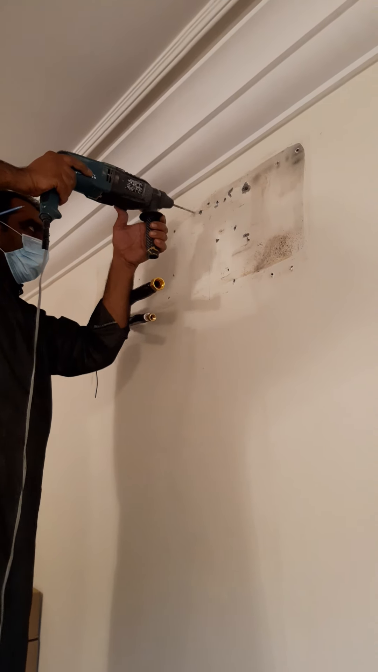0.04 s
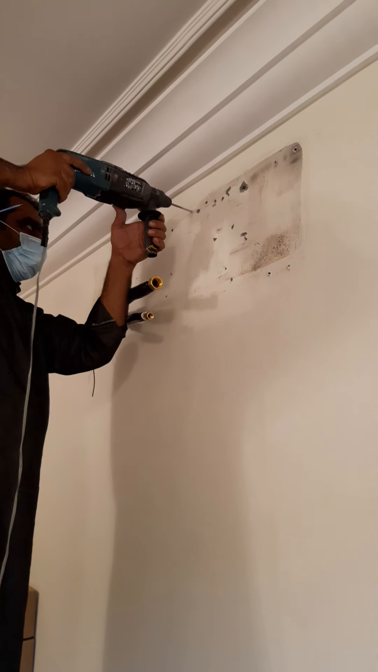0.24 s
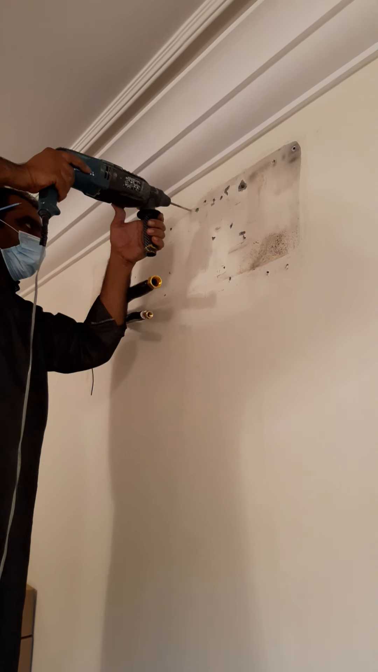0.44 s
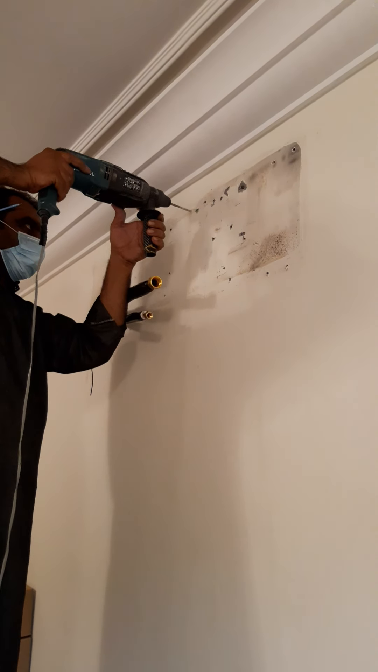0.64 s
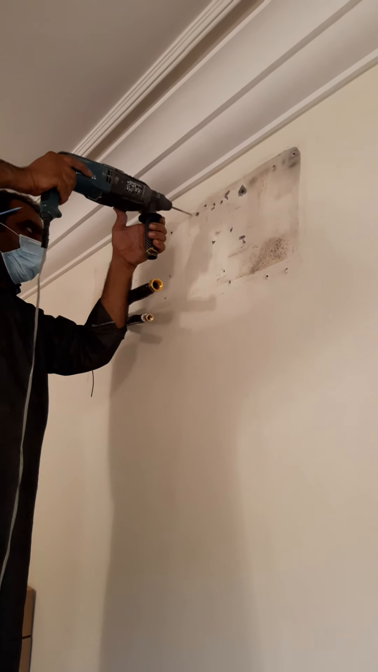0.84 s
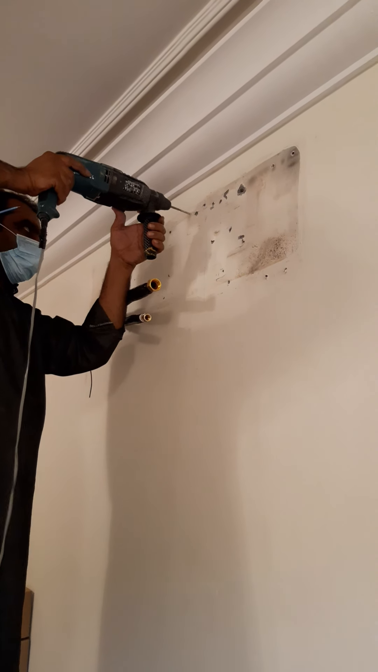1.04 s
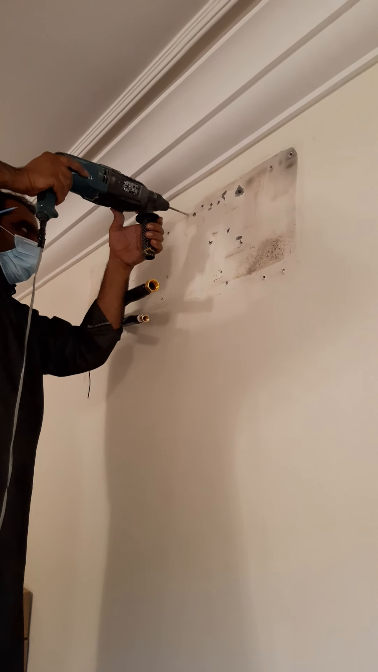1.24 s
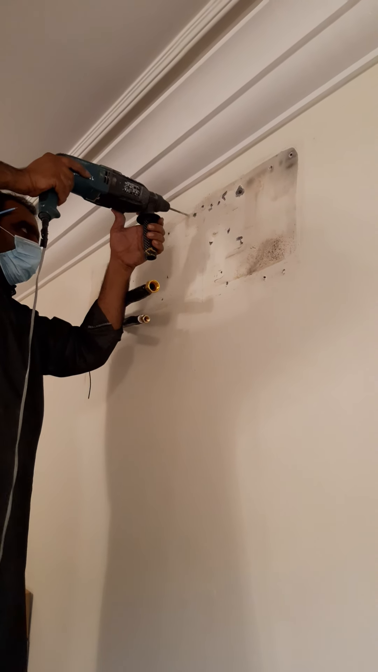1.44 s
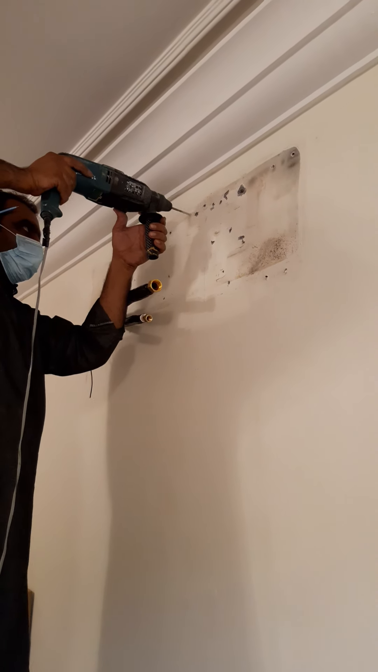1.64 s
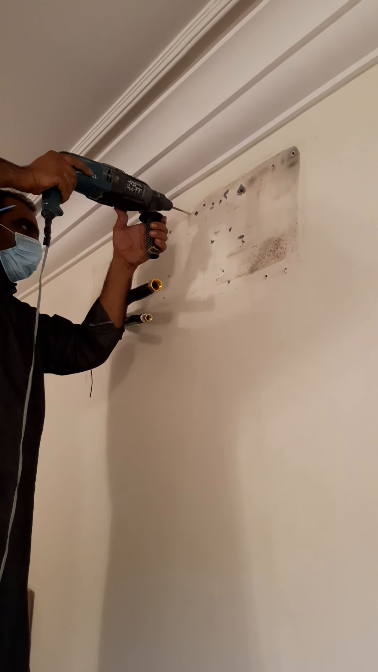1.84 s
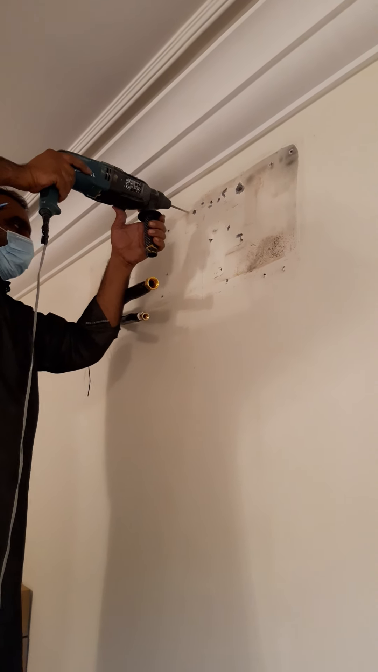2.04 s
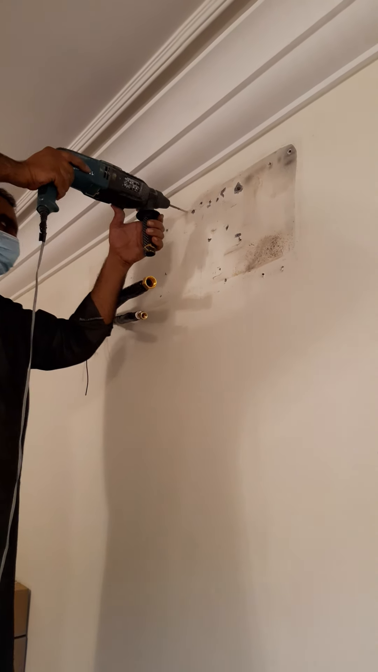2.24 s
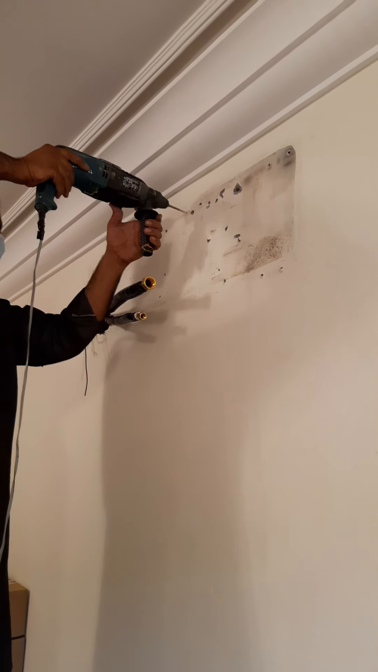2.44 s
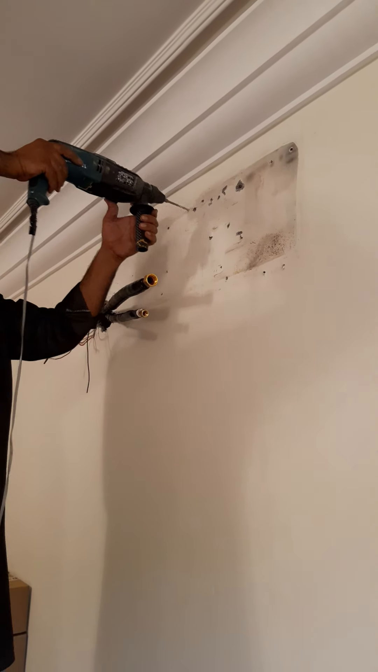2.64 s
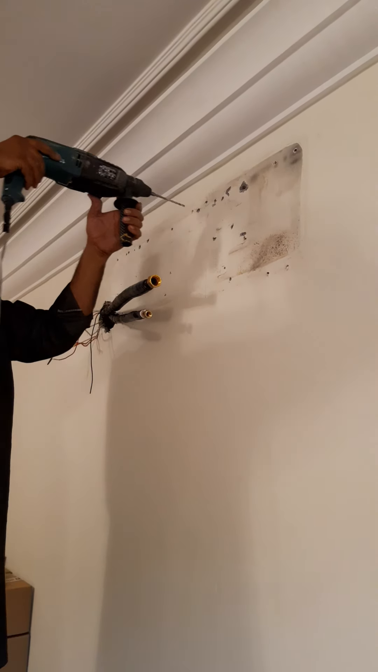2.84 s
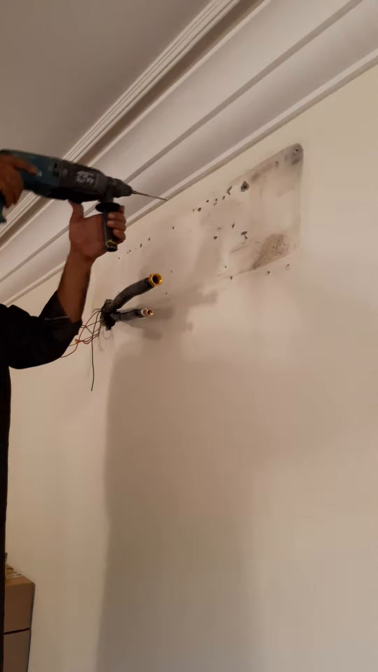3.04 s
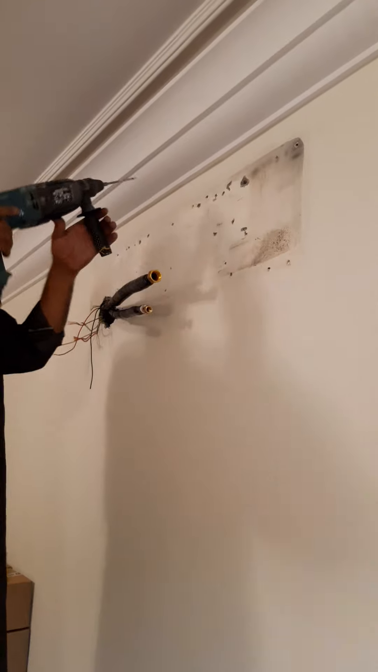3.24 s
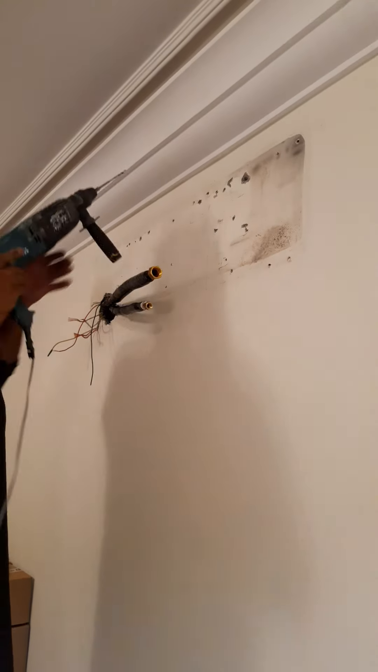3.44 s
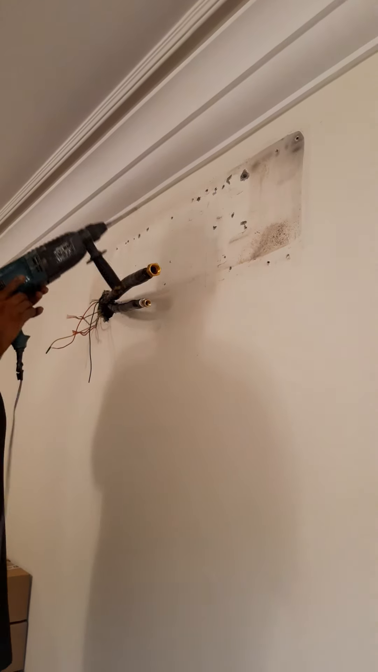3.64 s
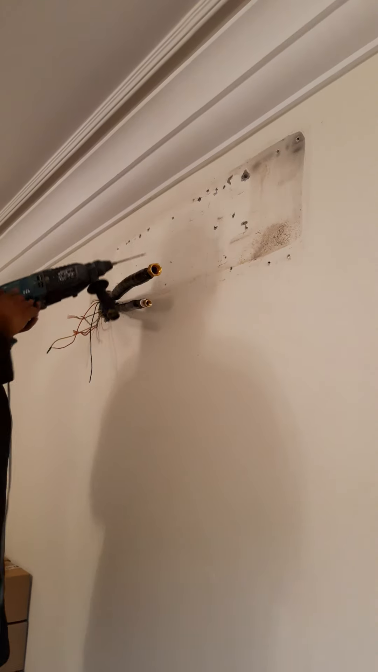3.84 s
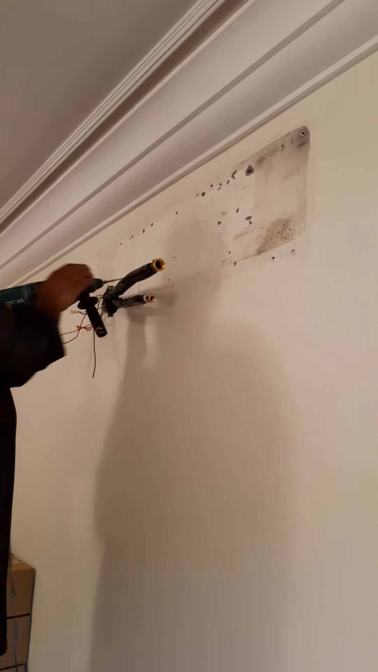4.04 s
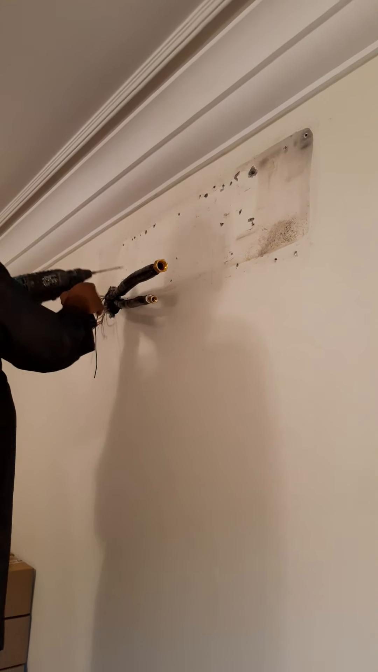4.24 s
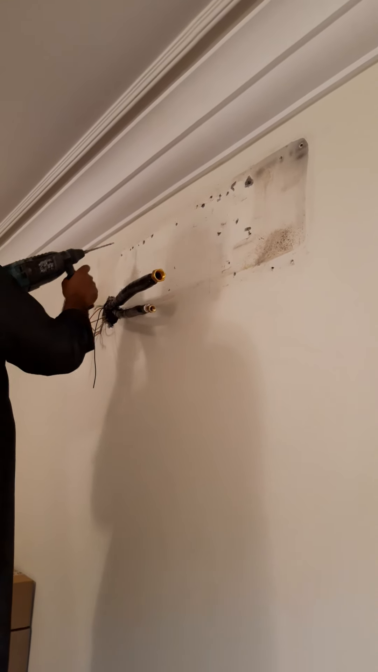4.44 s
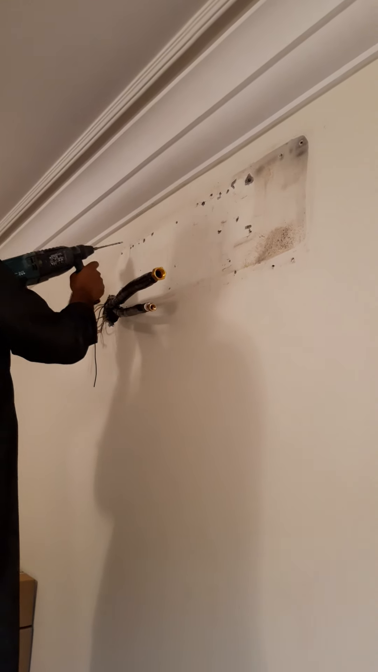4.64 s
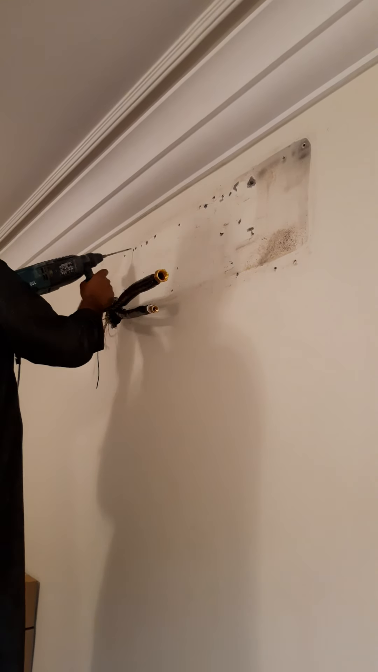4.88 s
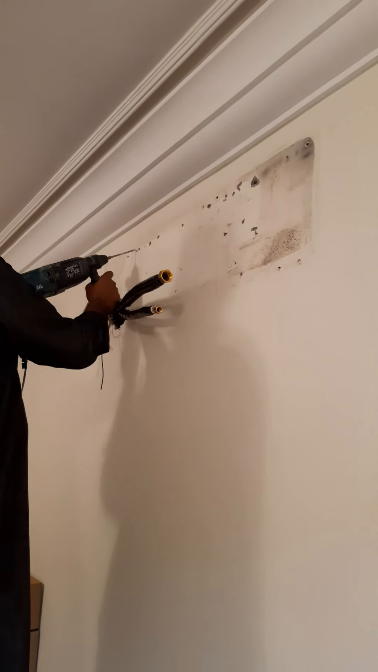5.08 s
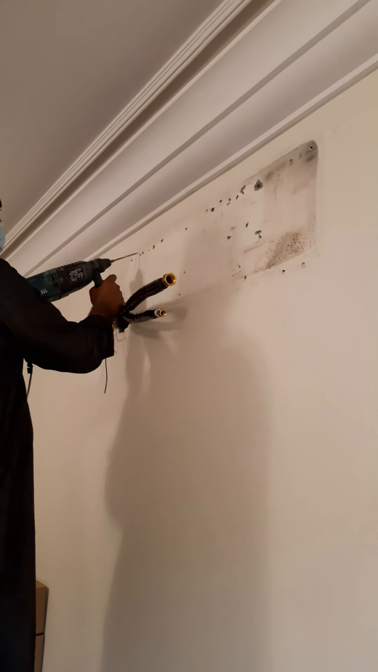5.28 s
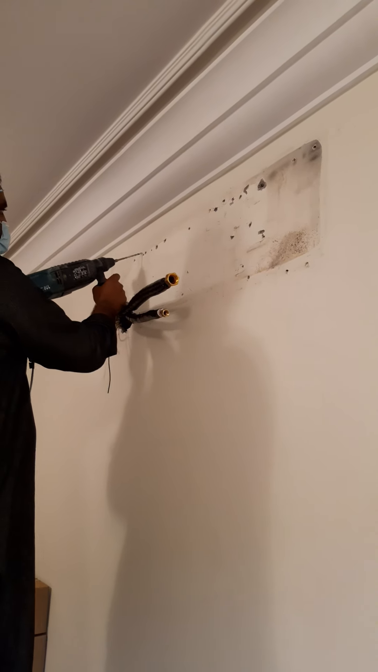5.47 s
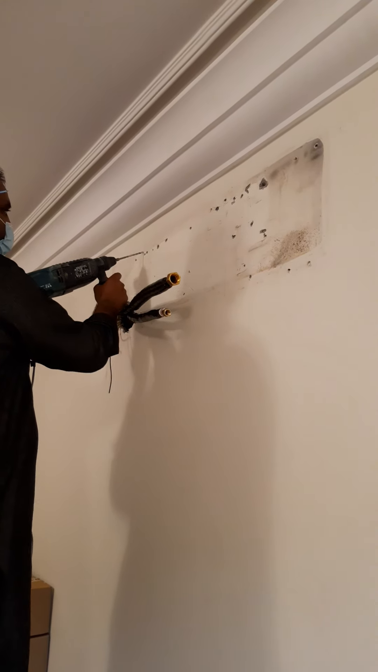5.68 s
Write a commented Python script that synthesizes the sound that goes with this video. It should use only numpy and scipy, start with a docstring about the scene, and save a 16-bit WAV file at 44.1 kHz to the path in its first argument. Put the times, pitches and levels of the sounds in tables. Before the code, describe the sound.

Loud hammer drilling into plaster stops and the motor spins down, then the tool knocks and scrapes lightly in an echoing room.

```python
"""First comes the loud, fast rattle of a corded hammer drill boring into a plastered wall in a bare room.
A striker hits the bit about 62 times a second; the bit grinds in the hole and the wall hums along.
The trigger is let go and the motor whines down. Then the drill, pulled out of the hole,
knocks and scrapes as it is shifted in the hands."""
import sys
import numpy as np
from scipy import signal
from scipy.fft import rfft, irfft, next_fast_len
from scipy.io import wavfile
from scipy.ndimage import map_coordinates

SR = 44100
rng = np.random.default_rng(int(sys.argv[2]) if len(sys.argv) > 2 else 0)


def digitize_waveform(pressure):
    """Quantize a signal to 16-bit integers and store it at the path in sys.argv[1].

    Rows of a 2-D input are taken as channels; values are limited to [-1, 1].
    """
    field = np.atleast_2d(pressure).T
    bounded = np.clip(field, -1, 1)
    quanta = np.round(bounded * 32767).astype(np.int16)
    wavfile.write(sys.argv[1], SR, quanta)


N = 251811
TOP_HZ = 15950  # the highest pitch kept
# the bit stops pressing on the wall; the blows start to die away; the gears come to rest
UNLOAD_S, LAST_BLOW_S, REST_S = 2.387, 2.55, 3.263


def amp(db):
    """Turn decibels into a number to multiply by."""
    return 10 ** (np.asarray(db) / 20)


def unit(x):
    """Scale a sound to an average power of 1."""
    return x / np.sqrt(np.mean(x ** 2) + 1e-20)


def along(points, hz):
    """Read between the rows of a (pitch_hz, value) table, on a log pitch scale."""
    pitches, values = np.transpose(points)
    return np.interp(np.log(hz + 1), np.log(pitches + 1), values)


def clock():
    """The time of each sample, in seconds."""
    return np.arange(N) / SR


def fade(start_s, db_per_s):
    """Full level until start_s, then a steady fall."""
    return amp(-db_per_s * np.maximum(clock() - start_s, 0))


def wobble(rate):
    """A smooth curve through rate random values a second."""
    return map_coordinates(rng.standard_normal(int(N * rate / SR) + 4), [clock() * rate])


def filtered(x, response):
    """Scale and delay each pitch in x as response(hz) says."""
    size = next_fast_len(N + SR // 2)
    return irfft(rfft(x, size) * response(np.fft.rfftfreq(size, 1 / SR)), size)[..., :N]


def coloured(x, spectrum, rings=(), size=4096):
    """Give x a broad tone colour with ringing pitches on top; the tables set shape, not loudness."""
    hz = np.fft.rfftfreq(size, 1 / SR)
    power = 1 + sum(amp(db) ** 2 / (1 + (2 * (hz - centre) / width) ** 2) for centre, width, db in rings)
    cepstrum = irfft(np.log(amp(along(spectrum, hz)) * np.sqrt(power) + 1e-6))
    # folding this in half makes the ringing come after each hit, never before
    cepstrum[1:size // 2] *= 2
    cepstrum[size // 2 + 1:] = 0
    ring = irfft(np.exp(rfft(cepstrum)))
    return signal.fftconvolve(x, ring / np.linalg.norm(ring))[:N]


def leading(x, lead_ms):
    """A stereo pair in which the left side arrives lead_ms earlier."""
    return filtered(x, lambda hz: np.exp(1j * np.pi * hz * lead_ms / 1000 * np.array([[1], [-1]])))


# how long the room's echo takes to fall by 60 dB: pitch_hz, decay_s
ROOM_DECAY = [(125, 0.83), (500, .8), (2000, 0.79), (5000, 0.59), (15000, 0.15)]


def room(x, wet_db, lead_ms, sway=10, spacing_m=0.15):
    """The direct sound plus the room's echo (at wet_db), heard at two points spacing_m apart."""
    hz, t, noise = signal.stft(rng.standard_normal((2, 2, 3 * SR // 4)), SR, nperseg=256)
    decay_s = along(ROOM_DECAY, hz)[:, None]
    tails = signal.istft(noise * amp(-60 * t / decay_s) / np.sqrt(decay_s), SR, nperseg=256)[1]
    # the moving tool sends its sound along new paths, sway times a second
    aim = 2 * wobble(sway)
    paths = np.array([[x * np.cos(aim)], [x * np.sin(aim)]])
    # whatever sounds at the start has already been echoing for a while
    paths = np.pad(paths, [(0, 0), (0, 0), (SR // 2, 0)], mode="reflect")
    echo = signal.fftconvolve(paths, tails / np.linalg.norm(tails[0, 0]), axes=2).sum(0)
    echo = echo[:, SR // 2:][:, :N]
    alike = lambda f: np.sinc(2 * f * spacing_m / 343)  # long waves reach both sides alike
    mid, side = filtered(echo, lambda f: np.sqrt(np.array([1 + alike(f), 1 - alike(f)]) / 2))
    wet = amp(wet_db)
    return (leading(x, lead_ms) + wet * np.array([mid + side, mid - side])) / np.hypot(1, wet)


# the trigger is let go; air drag slows the motor over DRAG_S; brush friction takes off turns_per_s
RELEASE_S, DRAG_S, FRICTION_PER_S = 2.435, .73, 20.5
# the crank's speed while drilling, sagging as the user leans in: time_s, turns_per_s
DRILLING_SPEED = [(0.0, 61.6), (0.25, 61.5), (0.65, 63.4), (0.88, 64.0), (1.08, 63.8), (1.36, 62.7),
                  (1.56, 61.2), (2.26, 62.7), (2.4, 61.9)]


def drilling_speed():
    """Turns a second while the bit works against the wall."""
    return np.interp(clock(), *np.transpose(DRILLING_SPEED))


def crank():
    """Turns a second: set by the load while drilling, then lost to drag and friction."""
    brake = FRICTION_PER_S * DRAG_S
    coasting_s = np.maximum(clock() - RELEASE_S, 0)
    speed = (drilling_speed() + brake) * np.exp(-coasting_s / DRAG_S) - brake
    return np.maximum(speed, 0) * (1 + .003 * wobble(35))  # it flutters as the bit catches


def halvings(speed):
    """How many times the speed has halved since the start."""
    return np.log2(speed[0] / np.maximum(speed, 1))


def strikes(turns, rebound_db, scatter_db, slop_ms, crush_ms, grit):
    """One blow a turn and three looser bounces of the bit: each a push and a burst of crushed plaster."""
    hits = np.flatnonzero(np.diff(np.floor(4 * turns)) > 0)
    is_rebound = np.arange(len(hits)) % 4 > 0
    size, slop = rng.standard_normal((len(hits), 2)).T
    late = slop * slop_ms * np.where(is_rebound, 8, 1) * SR / 1000
    landings = np.clip(hits + np.round(late).astype(int), 0, N - 1)
    pushes = np.bincount(landings, amp(scatter_db * size + rebound_db * is_rebound), N)
    crush = signal.lfilter([1], [1, -np.exp(-1000 / (crush_ms * SR))], pushes)
    return np.sqrt(1 - grit) * unit(pushes) + np.sqrt(grit) * unit(crush * rng.standard_normal(N))


BLOW_DB, BLOW_SLOWING_DB = -21.5, 17  # level at full speed; loss each time the speed halves
CLINK_DB, SHALLOW_DB, SINK_S = -31, 4.5, .3  # the clink is louder until the bit sinks into the plaster
# the tone colour of a blow: pitch_hz, level_db
BLOW_COLOUR = [(80, -46), (250, -16.5), (400, -12), (600, -8.5), (1000, -1.5), (1600, -1), (2300, -0.5),
               (3000, -3), (3900, -1.5), (4700, -6), (6600, -5.5), (7600, -19.5), (11000, -16.5),
               (16000, -52.5)]
# where the drill's housing rings: pitch_hz, width_hz, boost_db
HOUSING_RINGS = [(754, 37, 6.5), (1384, 79, 6), (1820, 210, 3), (2116, 48, 5)]
# the tone colour of the steel bit: pitch_hz, level_db
CLINK_COLOUR = [(4000, -42), (7000, -17), (8000, 0.5), (10500, -0.5), (13000, 5), (15500, 2.5)]


def hammer(speed, turns):
    """The blows ring the housing and wall, weaker as the crank slows; the steel bit adds a sharp clink."""
    blow_db = BLOW_DB - BLOW_SLOWING_DB * halvings(speed)
    clink_db = CLINK_DB + SHALLOW_DB * np.exp(-clock() / SINK_S)
    bite = amp(1.5 * wobble(35)) * fade(LAST_BLOW_S, 200)  # the bit catches and slips on grains
    blows = strikes(turns, rebound_db=-6.5, scatter_db=3, slop_ms=.07, crush_ms=2.2, grit=.48)
    blows = coloured(blows, BLOW_COLOUR, HOUSING_RINGS)
    clinks = strikes(turns, rebound_db=-14, scatter_db=-1, slop_ms=.21, crush_ms=.77, grit=.58)
    clinks = coloured(clinks, CLINK_COLOUR)
    body = room(blows * amp(blow_db) * bite, wet_db=4, lead_ms=.26, sway=5)
    steel = room(clinks * amp(clink_db + wobble(60)) * bite, wet_db=1, lead_ms=.27, sway=19)
    return body + steel


def boom(hz, centre_hz=245.5, width_hz=8.5):
    """How strongly the wall answers a tone: 1 at its own low pitch, less on either side."""
    return 1 / np.hypot(1, 2 * (hz - centre_hz) / width_hz)


HUM_DB, BOOM_DB = -48.5, -24
# tones of the shaken wall and housing: multiple_of_blow_rate, level_db (added to HUM_DB)
HUM_TONES = [(1, -10.5), (2, 1), (3, -2.5), (5, 12), (6, 11.5), (7, 10.5), (8, 10), (9, 3), (10, 5),
             (11, 6), (12, 12), (13, 11.5), (14, 10.5)]


def wall_hum(speed, turns):
    """The blows make the wall hum; it booms when four times their rate nears its own pitch."""
    def tone(cycles):
        return np.sqrt(2) * np.sin(2 * np.pi * (cycles + rng.random()) + .096 * wobble(14) + .06 * wobble(60))

    hum = sum(amp(db + 1.5 * wobble(4) + 1.2 * wobble(30)) * tone(k * turns) for k, db in HUM_TONES)
    hum = hum * amp(HUM_DB - BLOW_SLOWING_DB * halvings(speed)) * fade(UNLOAD_S, 70)
    boom_hz = 4 * drilling_speed()  # the boom holds its pitch as it dies away
    boom_level = amp(BOOM_DB + .8 * wobble(25)) * boom(boom_hz) * fade(UNLOAD_S, 100)
    return leading(hum + boom_level * tone(np.cumsum(boom_hz) / SR), lead_ms=.18)


RUMBLE_DB, RUMBLE_SLOWING_DB, ROTOR_DB = -39.5, 9, -55.5
JOLT_S, JOLT_WIDTH_S, JOLT_DB = 2.47, .045, 8  # the rumble swells as the bit comes loose
# the tone colour of the wall's rumble: pitch_hz, level_db
RUMBLE_COLOUR = [(20, -34.5), (45, -27), (85, -16), (135, -12), (260, 4.5), (400, 2), (700, -17),
                 (2000, -42.5), (6000, -76.5)]


def wall_rumble(speed, turns):
    """The wall rumbles; the falling hum of the motor's rotor wakes its boom once more in passing."""
    jolt_db = JOLT_DB * np.exp(-((clock() - JOLT_S) / JOLT_WIDTH_S) ** 2)
    level = amp(RUMBLE_DB + jolt_db - RUMBLE_SLOWING_DB * halvings(speed))
    rumble = coloured(rng.standard_normal(N), RUMBLE_COLOUR) * level
    rotor = amp(ROTOR_DB) * boom(12 * speed) * np.sin(2 * np.pi * 12 * turns) * fade(REST_S, 300)
    return room(rumble + rotor, wet_db=-1.5, lead_ms=.23)


MOTOR_DB, MOTOR_SLOWING_DB = -23.5, 9
WHINE_LOADED_DB, WHINE_FREE_DB = -12, -7.5  # whine against rattle: while drilling, and once free
# tones of the gear teeth and rotor slots: multiple_of_crank_speed, level_db
WHINE_TONES = [(24, -8), (48, 0), (72, -2), (96, -8), (120, -5), (144, -12), (192, -13), (288, -19),
               (384, -18), (480, -19), (576, -19)]
# the tone colour of the whine: pitch_hz, level_db
WHINE_COLOUR = [(200, -24.5), (580, -18), (760, -10), (1100, -12), (1400, -3), (1900, -1), (3000, -4.5),
                (6000, -4), (8000, -5.5), (11000, 3.5), (16000, -14)]
# where the gearbox rings, so that passing tones flare: pitch_hz, width_hz, boost_db
GEARBOX_RINGS = [(755, 55, 14), (1380, 110, 12), (1950, 200, 3), (10800, 1400, 10)]
# the tone colour of the rattling gears: pitch_hz, level_db
RATTLE_COLOUR = [(100, -37.5), (240, -17.5), (550, -9.5), (900, -5), (1300, -1), (2300, 0.5), (3200, -6),
                 (4800, -9.5), (6400, -9.5), (7700, -21), (9000, -15), (11000, -15), (13500, -19.5),
                 (16000, -29)]
# where the gears ring: pitch_hz, width_hz, boost_db
GEAR_RINGS = [(755, 35, 10), (1380, 110, 4), (2230, 150, -2)]


def motor(speed, turns):
    """Gears and rotor whine over the rattle of teeth and brushes; the whine falls and both fade as they slow."""
    def tone(k):
        blur = (.35 + .005 * k) * wobble(90)  # slack in the gears blurs the high tones most
        return np.sin(2 * np.pi * k * turns + blur) * (k * speed < TOP_HZ)

    level = amp(MOTOR_DB - MOTOR_SLOWING_DB * halvings(speed)) * fade(REST_S, 300)
    tones = sum(amp(db + 3.5 * wobble(45)) * tone(k) for k, db in WHINE_TONES)
    whine = coloured(tones, WHINE_COLOUR, GEARBOX_RINGS)
    whine = whine / np.std(whine[clock() > LAST_BLOW_S][:SR // 2])
    whine_db = np.interp(clock() - LAST_BLOW_S, [0, .15], [WHINE_LOADED_DB, WHINE_FREE_DB])
    shaft = np.cos(2 * np.pi * 6 * turns)
    rattle = unit(rng.standard_normal(N) * amp(5.6 * shaft + 2.4 * wobble(90)))
    gears = room(coloured(rattle, RATTLE_COLOUR, GEAR_RINGS) * level, wet_db=2.5, lead_ms=.29)
    return gears + room(whine * level * amp(whine_db), wet_db=-5, lead_ms=.13)


# the tone colour of the room's air: pitch_hz, level_db
HUSH_COLOUR = [(20, -28), (45, -19), (62, -6.5), (90, -8.5), (120, -0.5), (160, -16), (250, -11.5),
               (380, -16), (800, -13.5), (1800, -19), (3000, -31), (8000, -28), (16000, -29.5)]


def hush():
    """The quiet air of the room, a steady soft noise."""
    return room(coloured(rng.standard_normal(N), HUSH_COLOUR), wet_db=2, lead_ms=0) * amp(-73)


# a low bump while drilling: time_s, level_db
BUMPS = [(.79, -36)]


def wall_bump():
    """The wall gives a bump: deep noise that swells and dies in an instant."""
    swell = sum(amp(db) * np.exp(-np.abs(clock() - time_s) / .0096) for time_s, db in BUMPS)
    deep_noise = coloured(rng.standard_normal(N), [(20, -21), (60, 5), (140, -.5), (400, -37.5)])
    return leading(swell * deep_noise, lead_ms=.23)


# brief drops in the drill's level: time_s, half_width_s, depth_db
DIPS = [(1.433, 0.012, 5.5), (2.485, 0.014, 4.5)]


def level_dips():
    """A volume curve that stays at 1 except where it dips briefly."""
    dip = lambda time_s, width_s: np.exp(-np.minimum(np.abs(clock() - time_s) / width_s, 10) ** 4)
    return amp(-sum(depth_db * dip(time_s, width_s) for time_s, width_s, depth_db in DIPS))


# the tone colours of a dull touch and a bright one: pitch_hz, level_db
DULL_COLOUR = [(100, -20.5), (200, -14), (380, -10), (480, -0.5), (1200, -1), (2300, 1), (3200, -8.5),
               (6000, -17), (8000, -30), (16000, -39)]
BRIGHT_COLOUR = [(300, -31), (1200, -9), (2100, 3.5), (4000, 0.5), (6200, 0.5), (7500, -10), (8700, -7.5),
                 (10700, -12), (12500, -8.5), (15500, -16)]
# the hollow ring of the drill's casing: pitch_hz, width_hz, boost_db
CASING_RINGS = [(437, 30, 2.5), (682, 46, 6.5), (1016, 45, 8), (1220, 49, 5), (1770, 45, 3),
                (2180, 170, -3), (3320, 60, -11), (3750, 170, 3)]


def contact(touches, rough_db):
    """Surfaces stick and slip, ringing the casing; each touch is (force curve, brightness 0 to 1)."""
    dull_force = np.sqrt(sum(force ** 2 * (1 - bright) for force, bright in touches))
    bright_force = np.sqrt(sum(force ** 2 * bright for force, bright in touches))
    grain = unit(amp(rough_db * wobble(400)))
    dull = coloured(dull_force * grain * rng.standard_normal(N), DULL_COLOUR, CASING_RINGS)
    return dull + coloured(bright_force * grain * rng.standard_normal(N), BRIGHT_COLOUR, CASING_RINGS)


# knocks of the handled drill: start_s, level_db, brightness (0 dull knock to 1 bright click)
KNOCKS = [(3.235, -35, .2), (3.844, -52, .02), (3.863, -43, 1), (4.064, -35, .03), (4.205, -48, .15),
          (4.354, -37, .05), (4.431, -30.5, .12), (4.522, -39, .2), (4.834, -43, .15), (4.878, -45, .12),
          (4.985, -47, .2)]


def knocks(decay_s=.008):
    """Each knock is a sudden push on the casing that dies away quickly."""
    t = clock()
    touches = [(amp(db) * (t >= start_s) * np.exp(-np.abs(t - start_s) / decay_s), bright)
               for start_s, db, bright in KNOCKS]
    return room(contact(touches, rough_db=1), wet_db=2, lead_ms=-.4)


# sleeve and housing scraping: start_s, end_s, level_db, brightness (0 dull to 1 bright)
SCRAPES = [(3.465, 3.84, -59.5, .06), (3.605, 3.73, -56.5, 0.37), (3.865, 4, -51, 0.52),
           (3.98, 4.065, -48.5, 0.54), (4.07, 4.144, -44, .01), (4.164, 4.426, -52.5, 0.072),
           (4.442, 4.592, -39.5, 0.1), (4.878, 5.045, -47, .003)]


def scrapes(attack_s=.0052, ease_db_per_s=19, release_s=.021):
    """Each scrape takes hold, eases off as it slides, and lets go."""
    t = clock()
    touches = []
    for start_s, end_s, db, bright in SCRAPES:
        stroke = np.clip(np.minimum((t - start_s) / attack_s, (end_s - t) / release_s), 0, 1)
        touches.append((amp(db) * stroke * fade(start_s, ease_db_per_s), bright))
    return room(contact(touches, rough_db=1.5), wet_db=3.5, lead_ms=-.4)


# how much louder the left side is than the right: pitch_hz, left_minus_right_db
SIDE_BALANCE = [(60, -3.5), (125, -6.5), (250, -1.7), (500, -0.5), (1100, -3.5), (2000, -7), (4000, -1),
                (8000, 1), (13000, 4.5)]


def scene():
    """The crank drives hammer, wall and motor; handling follows. Each side has its own tone colour."""
    speed = crank()
    turns = np.cumsum(speed) / SR
    drill = hammer(speed, turns) + wall_hum(speed, turns) + wall_rumble(speed, turns)
    drill = (drill + motor(speed, turns) + wall_bump()) * level_dips()
    handling = (knocks() + scrapes()) * amp([[-1.16], [1.16]])  # a little to the right
    mix = drill + handling + hush()
    return filtered(mix, lambda hz: amp(along(SIDE_BALANCE, hz) * np.array([[1], [-1]]) / 2))


def record(dry):
    """Round off the highest peaks, start softly and cut the treble above TOP_HZ."""
    rounded = dry / (1 + np.abs(dry / .75) ** 6) ** (1 / 6)
    soft_start = np.minimum(clock() / .006, 1)
    return filtered(rounded * soft_start, lambda hz: 1 / (1 + (hz / TOP_HZ) ** 160))


dry = scene()
out = record(dry)
digitize_waveform(out)
```